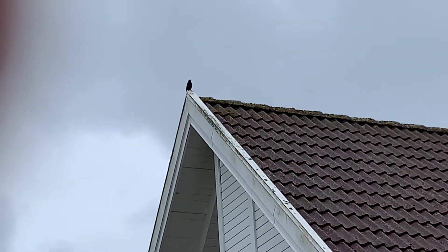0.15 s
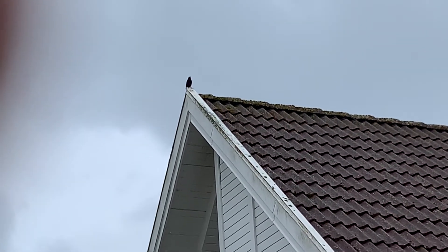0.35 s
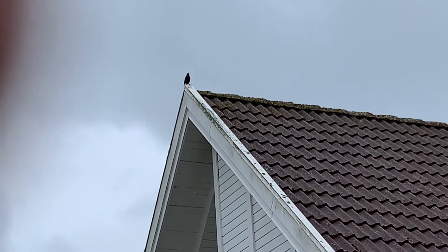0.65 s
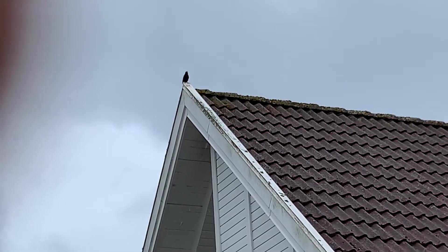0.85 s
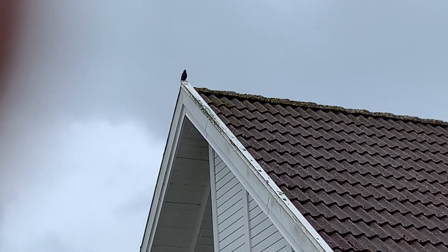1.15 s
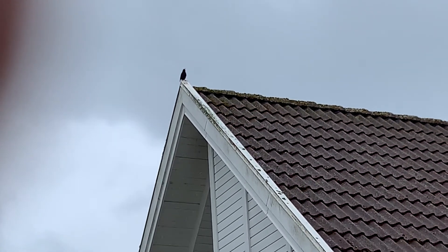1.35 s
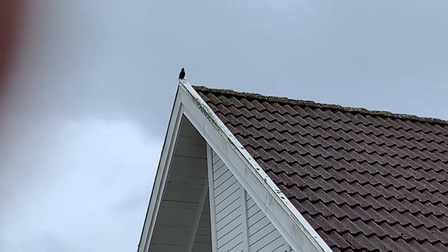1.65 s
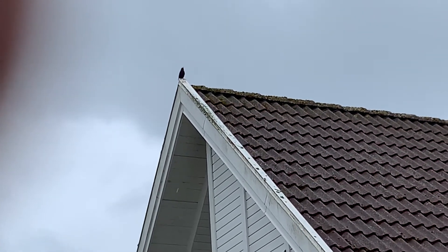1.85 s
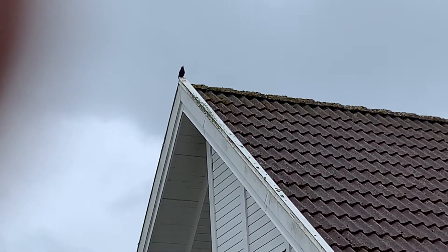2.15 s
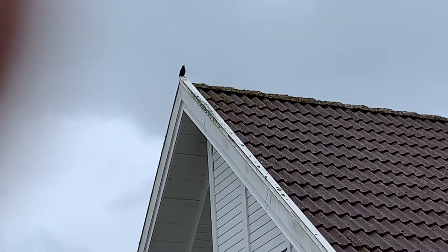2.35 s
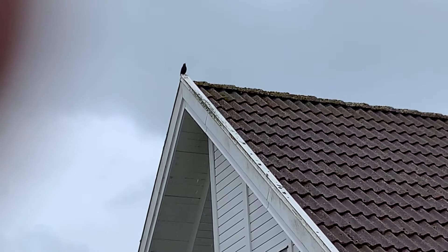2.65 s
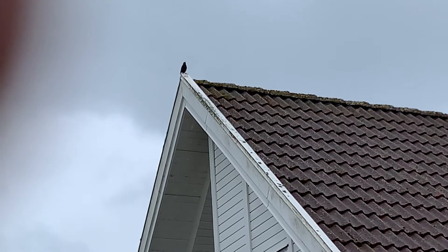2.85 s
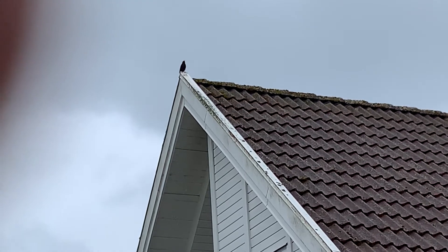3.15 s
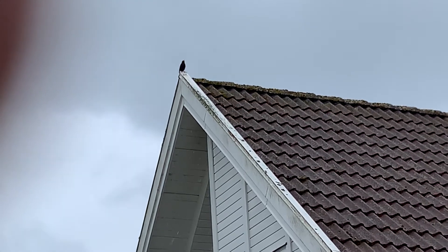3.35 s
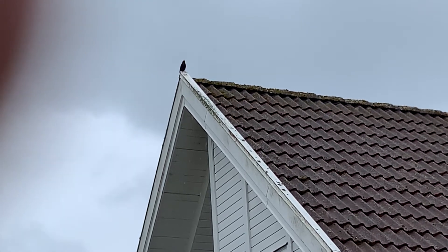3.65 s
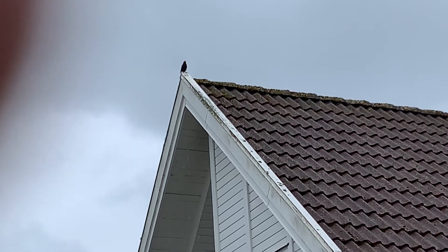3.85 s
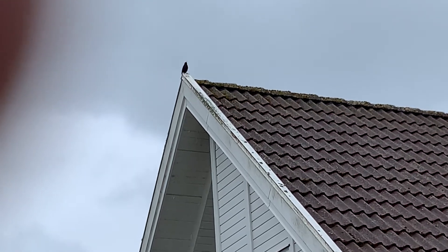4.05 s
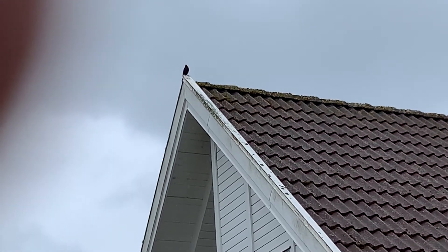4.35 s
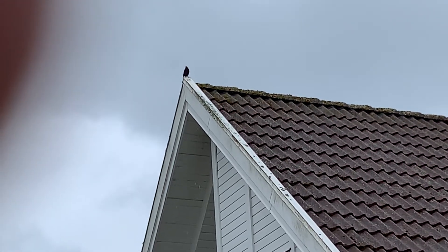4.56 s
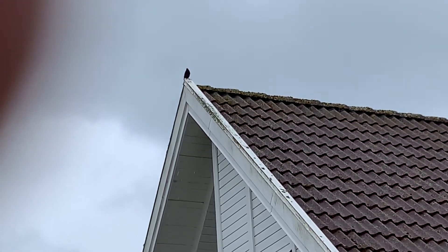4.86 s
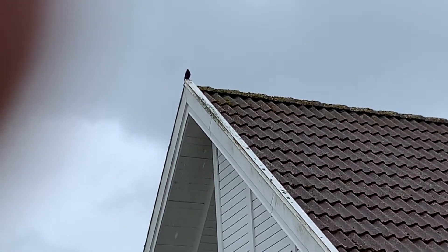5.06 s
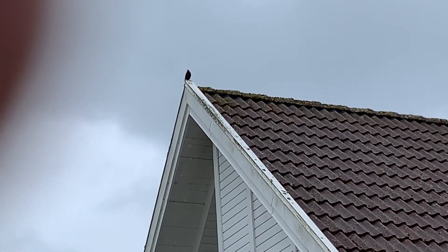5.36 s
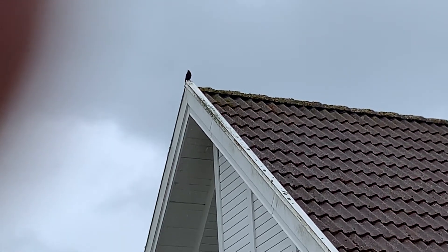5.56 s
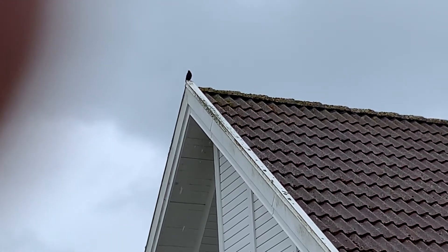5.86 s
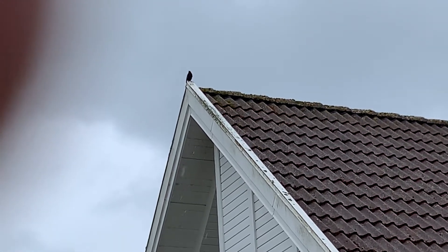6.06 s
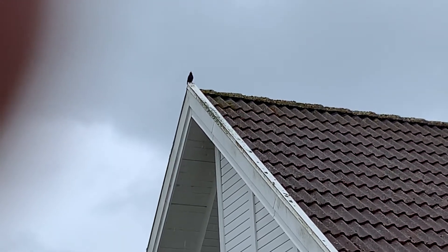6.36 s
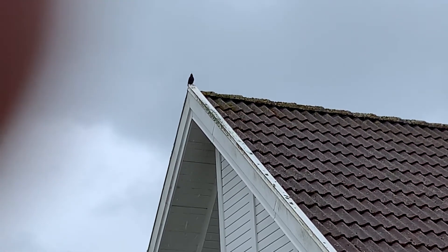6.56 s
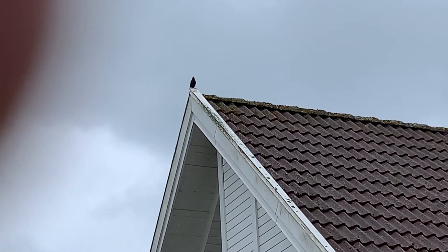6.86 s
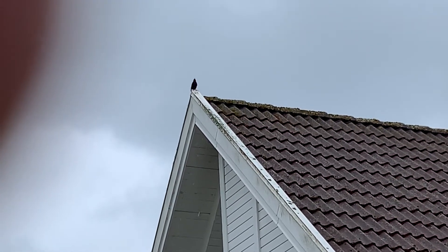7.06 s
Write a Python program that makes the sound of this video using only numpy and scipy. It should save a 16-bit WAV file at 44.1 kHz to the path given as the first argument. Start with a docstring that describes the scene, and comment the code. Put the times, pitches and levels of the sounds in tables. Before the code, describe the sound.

A blackbird sings two fluty phrases outdoors, early and late, while sparrows chirp steadily among houses and soft low wind thumps the microphone.

```python
"""Wind thumps softly from the start: lumpy noise plus eddies of falling pitch, over a low drone and a faint wash.
Sparrows chirp from the outset, off among echoing house walls: short gliding partials, hoarse where pitch shakes.
A blackbird soon sings two fluty phrases, early and late: near-pure gliding whistles with weak breathy overtones.
Faint mid-scene whistles come from far-off birds. Throughout, two microphone ports hear the treble out of step."""
import sys
import numpy as np
from scipy import signal
from scipy.fft import rfft, irfft, next_fast_len
from scipy.io import wavfile
from scipy.ndimage import uniform_filter1d, map_coordinates

SR = 44100
rng = np.random.default_rng(int(sys.argv[2]) if len(sys.argv) > 2 else 0)


def inscribe(sig):
    """Save sig as 16-bit PCM at rate SR to the path in sys.argv[1].

    A 1-D sig is mono; a 2-D sig holds one channel per row.
    Samples are clipped to [-1, 1] before scaling.
    """
    pcm = np.round(np.clip(np.atleast_2d(sig).T, -1, 1) * 32767)
    wavfile.write(sys.argv[1], SR, pcm.astype(np.int16))


N = 317520
TOP_HZ = 15850  # band limit


def amp(db):
    """dB to linear gain."""
    return 10 ** (np.asarray(db) / 20)


def unit(x):
    """x scaled to RMS 1."""
    return x / np.sqrt(np.mean(x ** 2) + 1e-20)


def along(points, hz):
    """(f/Hz, value) points read on a log frequency axis."""
    f, v = np.transpose(points)
    return np.interp(np.log(hz + 1), np.log(f + 1), v)


def curves(rows, t):
    """Each column after the time, read at the times t."""
    s, *cols = np.transpose(rows)
    return [np.interp(t, s, c) for c in cols]


def wobble(rate_hz, size=N):
    """A smooth random curve, rate_hz knots a second."""
    knots = rng.standard_normal(int(size * rate_hz / SR) + 4)
    return map_coordinates(knots, [np.arange(size) * rate_hz / SR])


def filtered(x, response):
    """x times a complex response of frequency."""
    m = next_fast_len(N + SR // 2)
    spectrum = rfft(x, m) * response(np.fft.rfftfreq(m, 1 / SR))
    return irfft(spectrum, m)[..., :N]


def add(track, s, sound):
    """Mixes a sound into the track at time s."""
    at = round(s * SR) + np.arange(sound.shape[-1])
    inside = (at >= 0) & (at < N)
    track[..., at[inside]] += sound[..., inside]


def span(rows):
    """Sample times from the first row to the last."""
    return np.arange(rows[0][0], rows[-1][0], 1 / SR)


def phase(hz):
    """Running phase in radians of a moving pitch."""
    return 2 * np.pi * np.cumsum(hz) / SR


def window(t, start, end):
    """1 between start and end, with 5 ms ramps inside."""
    return np.clip(np.minimum(t - start, end - t) / .005, 0, 1)


def tail(decays):
    """A diffuse echo tail, partly different at each port; each frequency dies at its own speed."""
    hz, t, z = signal.stft(rng.standard_normal((2, SR)), SR, nperseg=128)
    decay_db = -60 * t / along(decays, hz)[:, None]
    a, b = signal.istft(z * amp(decay_db), SR, nperseg=128)[1][:, :SR]
    return np.array([a, 0.36 * a + 1.106 * b]) / np.linalg.norm(a)


# echo decay off near roofs: f/Hz, t60/s
ROOF_DECAY = [(1500, 0.16), (4000, 0.3), (12000, 0.033)]
# echo decay off far walls: f/Hz, t60/s
WALL_DECAY = [(1500, 1), (3000, 0.83), (6000, 0.42), (12000, 0.12)]
SLAP_S, SLAP_DB, SLAP_BLUR_S = .097, -15, .00009  # facing wall's single dull echo; dB re straight sound


def heard(sound, direct_db, near_db, far_db):
    """One call as it arrives: straight, off near roofs, off far walls 20 ms later, plus one slap."""
    far_tail = np.roll(tail(WALL_DECAY), round(.02 * SR), axis=1)
    path = amp(near_db) * tail(ROOF_DECAY) + amp(far_db) * far_tail
    path[:, 0] += amp(direct_db)
    slap = np.exp(-((np.arange(SR) / SR - SLAP_S) / SLAP_BLUR_S) ** 2)
    path += amp(direct_db + SLAP_DB) * slap / slap.sum()
    return signal.fftconvolve(sound[None], path, axes=1)


# eddies hitting the ports: t/s, level/dB before onset and decay
EDDIES = [(0.208, -50.5), (0.274, -44.5), (0.423, -51.5), (0.884, -55), (1.093, -38.5), (1.701, -56),
          (2.215, -36.5), (2.884, -56), (3.936, -60.5), (4.343, -59), (5.103, -64), (5.261, -38.5),
          (5.338, -32.5), (5.433, -31), (5.439, -29), (5.527, -33.5), (5.606, -36.5), (5.653, -33.5),
          (5.695, -49), (5.757, -22.5), (5.815, -28), (5.892, -31.5), (6.028, -54.5), (6.484, -43),
          (6.589, -33.5), (6.702, -41.5), (6.789, -46.5), (6.862, -48), (7.111, -44.5), (7.169, -29.5)]
FAINT_COUNT, FAINT_DB = 18, -15.5  # faint eddies at chance times; mean dB re buffet curve
PUFF_HZ, REST_HZ = 322, 74.9  # pitch starts PUFF_HZ over REST_HZ


def eddies(buffet_db):
    """Single eddies hit sharply, fall in pitch and decay; each has a random port balance and polarity."""
    times_s = rng.uniform(0, N / SR, FAINT_COUNT)
    now = np.arange(N) / SR
    faint = [(s, np.interp(s, now, buffet_db) + FAINT_DB + 4 * rng.standard_normal()) for s in times_s]
    track, t = np.zeros(N), np.arange(SR // 10) / SR
    hz = REST_HZ + PUFF_HZ * np.exp(-t / 0.0074)
    onset = 1 - np.exp(-(t / 0.0032) ** 2)
    for s, db in EDDIES + faint:
        swing = np.sin(phase(hz) + rng.choice([0, np.pi]))
        decay = amp(db - 60 * t / 0.17)
        add(track, s - .002, decay * onset * swing)
    balance_db = [[.6], [-.6]] * wobble(17)
    return track * amp(balance_db)


# wind strength: t/s, buffet level/dB before trim, flutter level/dB re buffet before trim
WIND_LEVELS = [(0, -55.5, -0.5), (.25, -45, -22), (.42, -58, -17), (.84, -66, -12), (.95, -54, -7),
               (1.4, -48, -27), (2.0, -58, -13), (2.4, -64, 4), (2.8, -58, -9), (3.45, -46, -22),
               (3.6, -62, -0.5), (3.9, -58, 3), (4.3, -46.5, -23), (4.95, -42.5, -24.5), (5.2, -54.5, 1.5),
               (5.28, -31, -1.5), (5.85, -34.5, 0.5), (6.1, -40, -7.5), (7.2, -39, -14)]
# short shoves: t/s, buffet level/dB before trim, half length (to 1/e)/s, flutter level/dB re buffet before trim
SHOVES = [(0.304, -27.5, 0.018, -32), (0.889, -45.5, 0.022, -20), (1.102, -26, 0.013, -22),
          (1.716, -28.5, 0.016, -20), (1.88, -45.5, 0.051, -21), (2.229, -33.5, 0.027, -10),
          (3.283, -43.5, 0.023, -15), (4.388, -39.5, .03, -18), (4.57, -41, 0.033, -27),
          (5.094, -40, 0.024, -8.5), (5.416, -45.5, 0.034, -10), (6.173, -28, 0.009, -5),
          (6.233, -25, 0.014, -12.5), (6.511, -33.5, 0.025, 15), (6.584, -28, 0.057, -9.5),
          (6.714, -29, 0.031, -12), (6.932, -35.5, 0.044, -21), (7.194, -32, 0.045, -3.5)]
# buffet spectrum: f/Hz, relative level/dB per Hz
BUFFET_SPECTRUM = [(12, -44), (20, -22), (38, 1.5), (64, 6.5), (86, 3.5), (200, -19), (260, -49),
                   (440, -120)]
# flutter spectrum: f/Hz, relative level/dB per Hz
FLUTTER_SPECTRUM = [(47, -33), (80, -1), (258, -14.5), (388, -32.5), (579, -51), (700, -74), (910, -96),
                    (1540, -120)]
WIND_TRIM_DB, FLUTTER_TRIM_DB = -1.5, -6.5


def wind():
    """Turbulence at the ports: lumpy low buffeting, alike at both, partly unlike flutter, and eddies."""
    now = np.arange(N) / SR
    buffet_db, flutter_db = curves(WIND_LEVELS, now)
    shoves, flaps = sum(amp([[db], [db + above_db]]) * np.exp(-((now - s) / half_s) ** 2)
                        for s, db, half_s, above_db in SHOVES)
    lumps = wobble(12)  # shared by buffet and flutter
    low = filtered(rng.standard_normal(N), lambda hz: amp(along(BUFFET_SPECTRUM, hz)))
    buffet = unit(low * amp(2.4 * lumps))
    mid, side = filtered(rng.standard_normal((2, N)), lambda hz: amp(along(FLUTTER_SPECTRUM, hz)))
    high = mid + 0.56 * np.array([side, -side])
    flutter = unit(high * amp(4 * lumps + 3 * wobble(40)))
    steady = amp(buffet_db + 0.87 * wobble(12))
    buffeting = (steady + shoves) * buffet
    fluttering = amp(FLUTTER_TRIM_DB) * (steady * amp(flutter_db) + flaps) * flutter
    return amp(WIND_TRIM_DB) * (buffeting + fluttering) + eddies(buffet_db)


# drone spectrum: f/Hz, relative level/dB per Hz
DRONE_SPECTRUM = [(24, -30), (40, 1.5), (70, -22.5), (109, -10), (345, -20), (500, -28.5), (650, -62.5),
                  (1100, -120)]


def traffic():
    """A low steady drone under the wind: shaped noise, mostly alike at both ports."""
    mid, side = filtered(rng.standard_normal((2, N)), lambda hz: amp(along(DRONE_SPECTRUM, hz)))
    return amp(-69.5) * unit(mid + .3 * np.array([side, -side]))


# distant hiss spectrum: f/Hz, relative level/dB per Hz
TOWN_SPECTRUM = [(350, -12), (600, -15), (717, -8.5), (996, -5.5), (1920, -16.5), (2080, -7.5), (2700, -17),
                 (3510, -18.5), (7860, -34.5), (8650, -31.5), (12000, -28), (15800, -34)]
# hiss level: t/s, level/dB before TOWN_TRIM_DB
TOWN_LEVELS = [(0.0, -78.5), (1.46, -77.5), (1.62, -79.5), (3.3, -80), (6.05, -83), (6.92, -77.5),
               (7.2, -81)]
# likeness of the hiss at the two ports: f/Hz, correlation
TOWN_LIKENESS = [(100, 1), (300, 0.27), (700, 0.22), (4000, 0.2), (9000, 0.98)]
TOWN_TRIM_DB = 10.0


def town():
    """A faint wash of noise, gently uneven in time and pitch; port likeness depends on frequency."""
    z = signal.stft(rng.standard_normal((2, N)), nperseg=512)[2]
    field = uniform_filter1d(rng.standard_normal(z.shape[1:]), size=6, axis=0)
    field = uniform_filter1d(field, size=14, axis=1)
    pair = signal.istft(z * amp(1.7 * unit(field)), nperseg=512)[1][:, :N]

    def mid_side(hz):
        angle = np.arccos(np.clip(along(TOWN_LIKENESS, hz), -1, 1)) / 2
        return amp(along(TOWN_SPECTRUM, hz)) * [np.cos(angle), np.sin(angle)]
    mid, side = filtered(pair, mid_side)
    level_db = curves(TOWN_LEVELS, np.arange(N) / SR)[0] + TOWN_TRIM_DB
    return amp(level_db) * unit(np.array([mid + side, mid - side]))


SPARROW_TOP_HZ, FADE_DB_PER_KHZ = 6430, 11  # partials fade above this


def sparrow(calls, shape, **path):
    """One call shape, repeated; hoarseness shakes the pitch fast and smears the lines."""
    voice = np.zeros((2, N))
    t = span(shape)
    hz, *levels_db, hoarse = curves(shape, t)
    for s, db, factor in calls:
        shaken_hz = factor * hz * (1 + hoarse * wobble(900, size=len(t)))
        turn = phase(shaken_hz)
        wave = np.zeros(len(t))
        for k, level_db in enumerate(levels_db, start=1):
            fade_db = FADE_DB_PER_KHZ * np.maximum(k * shaken_hz - SPARROW_TOP_HZ, 0) / 1e3
            wave += amp(level_db - fade_db) * np.sin(k * turn)
        shake_db = 3.5 * wobble(250, size=len(t))
        wave = window(t, t[0], t[-1]) * amp(db + shake_db) * wave
        add(voice, s + t[0], heard(wave, **path))
    return voice


# near calls: t/s, level/dB before path, pitch factor
NEAR_CALLS = [(.003, -42.5, .98), (.895, -43.5, 0.95), (1.687, -44.5, 0.93), (2.48, -42.5, 0.97),
              (3.218, -45.5, 0.94), (3.921, -45, 0.94), (4.617, -43, 0.96), (5.799, -44.5, 0.95),
              (6.537, -43, 0.93)]
# chirp shape: t/s from loud onset, f/Hz before pitch factor, pitch, octave, twelfth level/dB re call, hoarseness 0-1
CHIRP_SHAPE = [(-.07, 1910, -45, -35.5, -37.5, 0), (-.04, 2050, -26.5, -18.5, -18, 0.17),
               (-.015, 2380, -21, -8, -22.5, 0.08), (-.008, 3240, -13.5, -20.5, -37, 0.06),
               (.004, 4080, 2.5, -37, -56.5, 0.01), (.028, 3713, -1.5, -36, -56, 0.08),
               (.05, 3343, -1, -35.5, -54.5, 0.04), (.072, 2958, -4.5, -34.5, -54, 0.05),
               (.092, 2490, -17.5, -38, -55.5, 0.07)]


def near_sparrow():
    """Nearer sparrow: rising then falling chirps."""
    return sparrow(NEAR_CALLS, CHIRP_SHAPE, direct_db=-6.0, near_db=1.5, far_db=-13.0)


# far calls: t/s, level/dB before path, pitch factor
FAR_CALLS = [(.25, -60.5, 0.98), (1.95, -61, 0.97), (2.725, -64.5, 1.03), (4.035, -67, 1.0)]
# cheep shape: t/s from loud onset, f/Hz before pitch factor, pitch, octave, twelfth level/dB re call, hoarseness 0-1
CHEEP_SHAPE = [(-.015, 3800, -21, -39, -67, .08), (0, 5600, 1, -6, -65, .06),
               (.012, 4362, 10.5, -40, -70, 0.059), (.035, 5056, -3.5, -55, -66, 0.04),
               (.055, 4410, -18, -52, -56, 0.12), (.075, 3903, 8, -40, -59, .05),
               (.095, 3250, 2, -37, -67, .05), (0.132, 3670, -9.5, -42, -77, 0.069),
               (.15, 3134, -15.5, -75, -48, .06)]


def far_sparrow():
    """Further sparrow: zigzag cheeps with more far-wall echo."""
    return sparrow(FAR_CALLS, CHEEP_SHAPE, direct_db=-15, near_db=-3, far_db=-2)


def repeated(figure, calls):
    """The notes of a figure, placed, scaled and transposed for each call."""
    notes = []
    for s, db, factor in calls:
        for octave_db, over_db, rows in figure:
            placed = [(s + at, factor * hz, level + db) for at, hz, level in rows]
            notes.append((octave_db + db, over_db + db, placed))
    return notes


# fluty notes: octave level/dB, higher overtones level/dB, rows of (t/s, f/Hz, level/dB); dB before path
SONG_NOTES = [ (-67, -69.5, [(0.41, 2150, -59), (0.43, 2120, -56.5), (0.44, 2290, -48.5), (0.48, 2250, -45),
              (0.525, 2121, -41.5)]), (-62.5, -73, [(0.52, 2157, -34.5), (0.56, 2074, -31),
              (0.6, 1963, -33.5), (0.665, 1897, -30.5), (0.69, 1870, -42)]), (-61, -67, [(0.74, 2267, -50),
              (0.757, 2483, -32), (0.78, 2198, -25), (0.81, 2010, -34), (0.822, 1776, -42)]),
              (-57.5, -63, [(0.872, 2420, -45), (0.9, 2490, -23.5), (0.96, 2254, -27.5), (0.99, 2392, -19),
              (1.007, 2674, -29), (1.02, 2363, -22)]), (-56.5, -55, [(1.016, 2378, -23.5),
              (1.023, 2769, -25), (1.06, 2751, -25.5), (1.092, 2729, -28), (1.103, 2580, -30.5)]),
              (-56, -75.5, [(1.248, 1544, -60.5), (1.26, 1618, -48), (1.285, 1660, -42.5),
              (1.325, 1680, -45.5)]), (-54.5, -67.5, [(1.322, 1677, -37), (1.335, 1714, -30.5),
              (1.36, 2068, -30), (1.39, 2004, -29.5), (1.415, 1925, -36), (1.44, 1850, -22.5),
              (1.482, 1734, -34.5)]), (-59, -59.5, [(1.543, 2865, -46), (1.565, 2861, -31.5),
              (1.585, 2687, -20), (1.597, 2545, -27), (1.61, 2292, -37)]),
              (-68, -65.5, [(1.677, 1973, -45.5), (1.72, 1888, -29.5), (1.74, 2023, -31.5),
              (1.77, 2029, -28.5), (1.8, 2115, -34), (1.825, 2131, -26.5), (1.85, 2262, -35.5),
              (1.89, 2360, -32), (1.91, 2380, -47.5)]), (-52, -92, [(2.465, 7160, -57.5), (2.5, 7020, -31),
              (2.54, 6550, -29.5), (2.58, 5630, -37), (2.615, 4710, -50.5)]),
              (-48.5, -79, [(6.192, 1784, -51), (6.21, 1830, -44), (6.235, 1760, -38), (6.258, 1900, -39)]),
              (-61.5, -67.5, [(6.258, 1900, -40), (6.267, 2554, -29), (6.29, 2210, -31),
              (6.31, 1804, -38.5)]), (-53, -76, [(6.333, 2116, -40.5), (6.345, 2018, -35),
              (6.39, 1978, -37), (6.415, 1970, -52), (6.435, 1880, -33.5), (6.47, 1753, -50.5)]),
              (-48, -53, [(6.533, 2130, -47.5), (6.545, 2313, -45.5), (6.565, 2210, -37)]),
              (-64, -65, [(6.56, 2378, -28.5), (6.6, 2330, -27), (6.63, 2171, -29.5)]),
              (-68, -70, [(6.625, 2111, -34.5), (6.67, 2433, -33.5), (6.71, 2529, -34),
              (6.745, 2633, -28.5), (6.78, 2690, -31.5), (6.82, 2644, -22), (6.852, 2684, -30)]),
              (-49, -75.5, [(6.962, 1735, -60), (6.975, 1809, -53.5), (7.0, 1868, -37.5),
              (7.016, 1950, -56)]), (-53.5, -66, [(7.014, 1930, -47), (7.058, 1899, -35.5),
              (7.075, 1894, -29.5), (7.1, 1850, -35), (7.149, 1880, -31), (7.161, 1850, -36),
              (7.172, 1889, -27), (7.199, 1848, -25.5)]), ]
# up-down squeak: octave level/dB, overtones level/dB, rows of (t/s from start, f/Hz, level/dB); before call scaling
FLICK_FIGURE = [(-57, -100, [(0, 5920, -41.5), (.015, 7300, -45.5), (.028, 8470, -48.5),
                (.036, 7500, -36.5), (.046, 6046, -29.5)])]
# squeak from both sides of the voice box: same columns
DUET_FIGURE = [(-56, -70, [(0, 3900, -38), (.016, 5050, -40.5), (.031, 5250, -36), (.065, 5310, -60)]),
               (-53.5, -100, [(.006, 4934, -54.5), (.018, 5900, -39.5), (.04, 5734, -43),
               (.06, 6260, -70)])]
# flick repeats: t/s, level/dB offset, pitch factor
FLICK_CALLS = [(2.01, 1.5, 1.01), (2.135, -2.5, .99)]
# duet repeats: t/s, level/dB offset, pitch factor
DUET_CALLS = [(2.238, 0, .99), (2.353, -2.5, 1.02)]
# warbles: start t/s, end t/s, rate f/Hz, pitch swing/Hz, level swing/dB
WARBLE_SPANS = [(.428, .53, 38.5, 70, 6.5), (0.528, .69, 33, 109.4, 2), (1.018, 1.103, 35.5, 430, -0.15),
                (1.78, 1.91, 110, 79.6, 0.5), (6.622, 6.725, 95, 69.77, 4), (6.724, 6.812, 63, 25.13, 3.5),
                (7.073, 7.162, 39, 108.3, -1)]
# alternate cycles differ: start t/s, end t/s, half-order partials level/dB re whistle
DOUBLING_SPANS = [(1.579, 1.597, -25.5), (6.792, 6.857, -36.5)]
# throat colour of the higher overtones: f/Hz, level/dB
THROAT_COLOUR = [(4500, -2), (5500, 5.5), (7000, 8.5), (9000, 2), (11500, 4), (13500, -10.5), (15500, -12)]
OCTAVE_FOLLOWS, OVER_FOLLOWS = .55, 1  # dB lost per dB that the note is under its loudest
SNAP = 1.1  # warble dwell at top and bottom: near 0 smooth, 3 square


def blackbird():
    """A nearly pure whistle with weak breathy overtones; some notes warble or double their period."""
    song = np.zeros((2, N))
    for octave_db, over_db, note in (SONG_NOTES + repeated(FLICK_FIGURE, FLICK_CALLS)
                                     + repeated(DUET_FIGURE, DUET_CALLS)):
        t = span(note)
        hz, db = curves(note, t)
        under_db = db - db.max()
        pulse_db = np.zeros(len(t))
        for start, end, rate_hz, swing_hz, swing_db in WARBLE_SPANS:
            cycle = np.cos(2 * np.pi * rate_hz * (t - start))
            beat = -np.tanh(SNAP * cycle) / np.tanh(SNAP) * window(t, start, end)
            hz = hz + swing_hz * beat
            pulse_db = pulse_db + swing_db * beat
        # overtones thin out while the pitch jumps
        leap_per_s = uniform_filter1d(np.abs(np.gradient(np.log(hz), t)), size=130)
        turn = phase(hz * (1 + .004 * wobble(150, size=len(t))))

        def breath(share):
            return 1 - share + share * wobble(350, size=len(t))
        over = np.zeros(len(t))
        for k in range(3, 9):
            colour = amp(along(THROAT_COLOUR, k * hz)) * (k * hz < TOP_HZ)
            over += colour * breath(.6) * np.sin(k * turn)
        half = sum(amp(level_db) * window(t, start, end) for start, end, level_db in DOUBLING_SPANS)
        whistle = amp(db) * (np.sin(turn) + half * (np.sin(3 * turn / 2) + np.sin(5 * turn / 2)))
        octave = amp(octave_db + OCTAVE_FOLLOWS * under_db) * breath(.3) * np.sin(2 * turn)
        upper = octave + amp(over_db + OVER_FOLLOWS * under_db - .45 * leap_per_s) * over
        shape = window(t, t[0], t[-1]) * amp(pulse_db)
        add(song, t[0], heard(shape * whistle, direct_db=2.0, near_db=-5.5, far_db=-18.5))
        add(song, t[0], heard(shape * upper, direct_db=7.5, near_db=0, far_db=-3))
    return song


# whistles of far-off birds, one list each: t/s, f/Hz, level/dB before path
FAR_WHISTLES = [
    [(3.76, 4410, -75.5), (3.8, 4570, -80), (3.86, 4540, -76.5)],
    [(4.98, 2730, -76), (5.06, 2810, -80.5), (5.11, 2690, -71), (5.17, 2820, -73), (5.25, 2704, -83)],
]


def far_birds():
    """Thin whistles, wavering in pitch and level, with a light echo."""
    out = np.zeros((2, N))
    for note in FAR_WHISTLES:
        t = span(note)
        hz, db = curves(note, t)
        level = amp(db + 1.3 * wobble(40, size=len(t)))
        tone = np.sin(phase(hz * (1 + 0.013 * wobble(60, size=len(t)))))
        wave = window(t, t[0], t[-1]) * level * tone
        add(out, t[0], heard(wave, direct_db=-2, near_db=-16.0, far_db=-14.5))
    return out


def scene():
    """Sum of all sources at the two ports."""
    air = wind() + traffic() + town()
    return air + near_sparrow() + far_sparrow() + blackbird() + far_birds()


# port mismatch: f/Hz, right's lead/rad, left over right level/dB
PORT_MISMATCH = [(300, 0, 0), (700, .1, 1), (1200, 1.5, 3), (1750, .7, 3), (2070, .9, 0), (2410, 2.8, -1),
                 (2750, 6, 0), (3200, 5, -1), (4130, 6.1, -1), (4820, 5.3, -4), (5170, 7.6, -3),
                 (5860, 9, -4), (6200, 12, -4), (6550, 12.7, -5), (7200, 12.7, 3), (7600, 14.2, 0),
                 (8270, 15.5, 0), (11000, 18.9, 0), (15500, 25, 0)]


def record(dry):
    """Each port colours and shifts the sound in its own way; nothing above the band limit is kept."""
    def ports(hz):
        f, lead_rad, tilt_db = np.transpose(PORT_MISMATCH)
        # half the mismatch on each port
        half = amp(np.interp(hz, f, tilt_db) / 2) * np.exp(-.5j * np.interp(hz, f, lead_rad))
        return np.array([half, 1 / half]) * (hz < TOP_HZ)
    return filtered(dry, ports)


dry = scene()
out = record(dry)
inscribe(out)
```